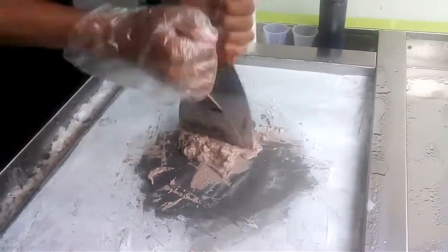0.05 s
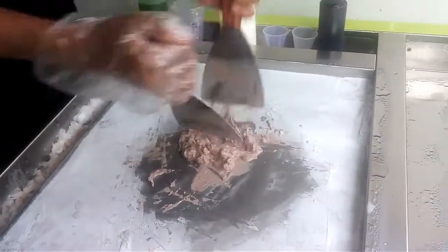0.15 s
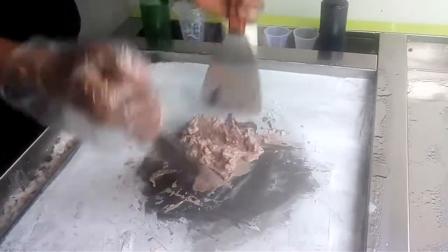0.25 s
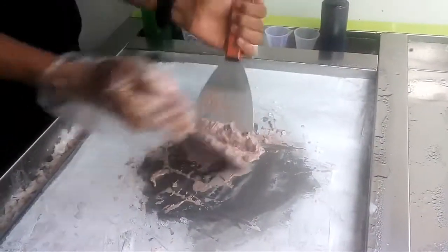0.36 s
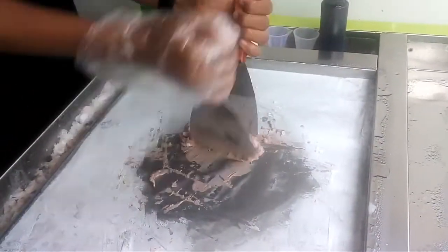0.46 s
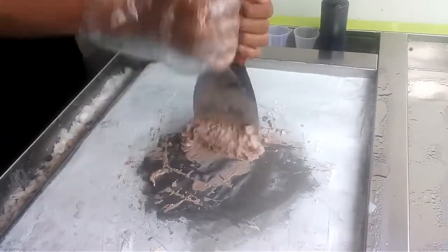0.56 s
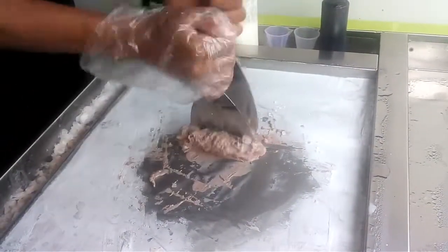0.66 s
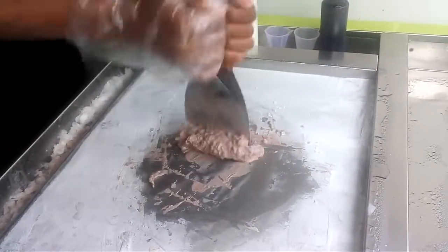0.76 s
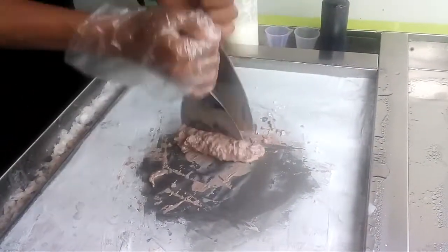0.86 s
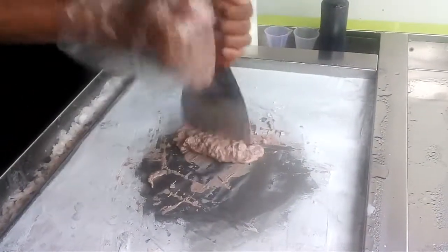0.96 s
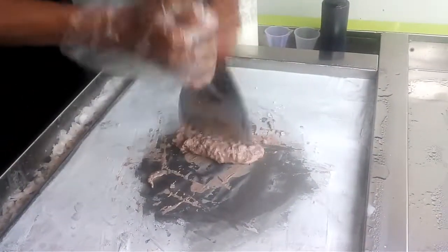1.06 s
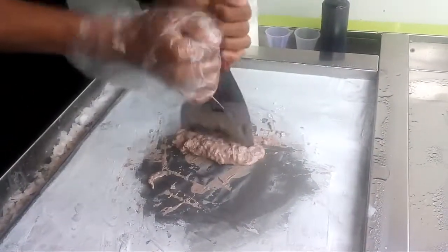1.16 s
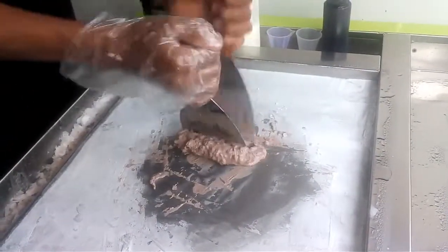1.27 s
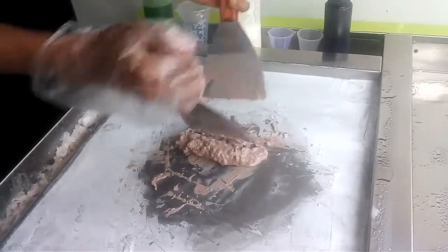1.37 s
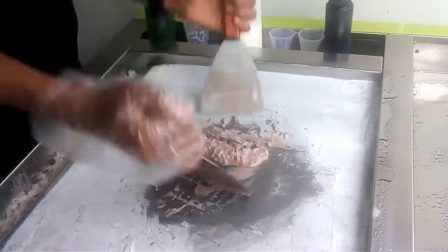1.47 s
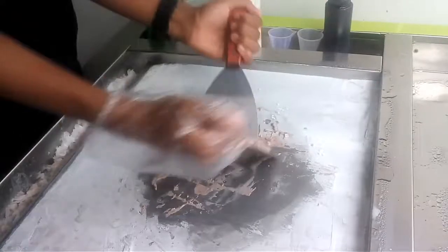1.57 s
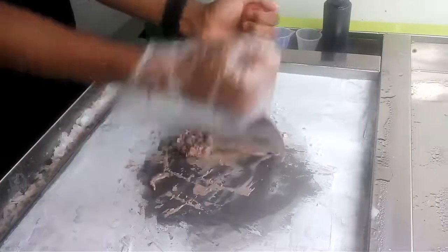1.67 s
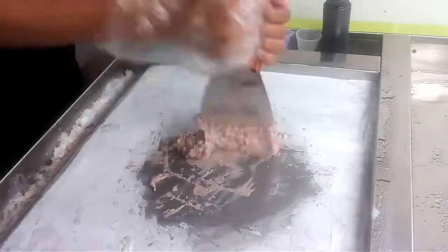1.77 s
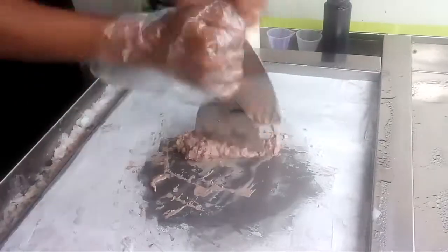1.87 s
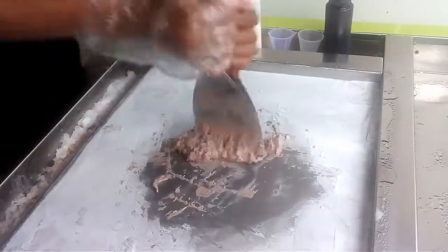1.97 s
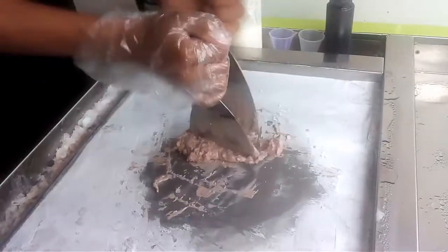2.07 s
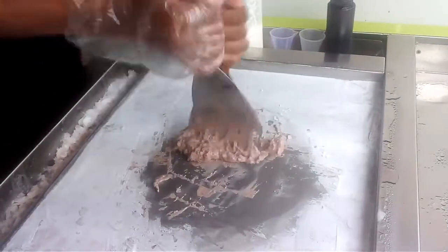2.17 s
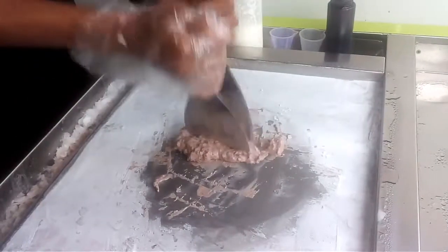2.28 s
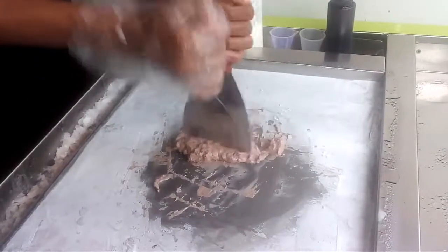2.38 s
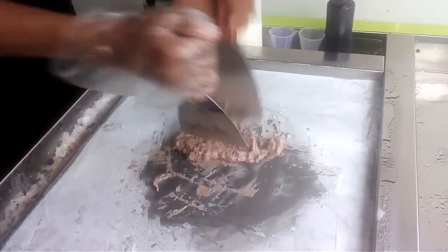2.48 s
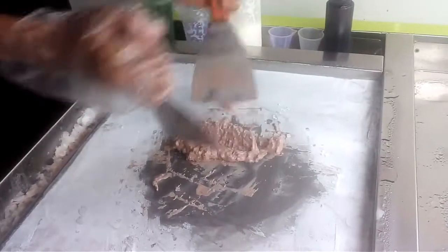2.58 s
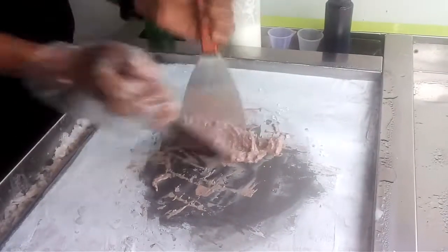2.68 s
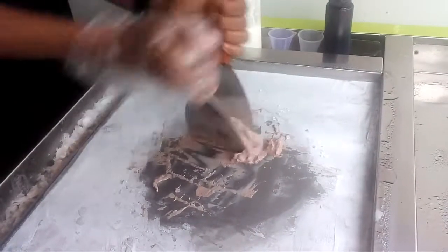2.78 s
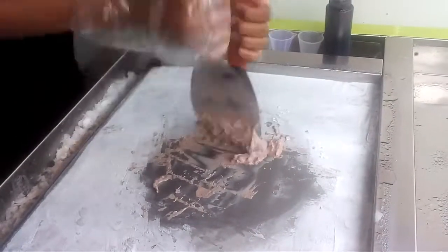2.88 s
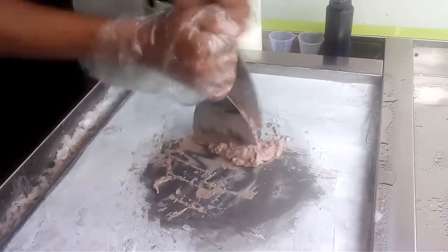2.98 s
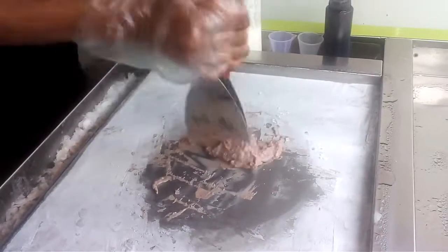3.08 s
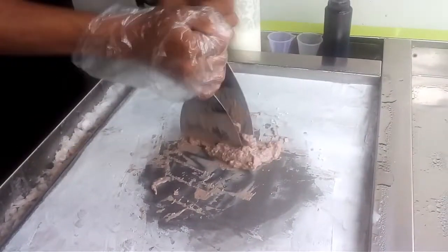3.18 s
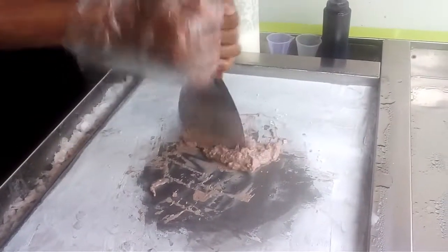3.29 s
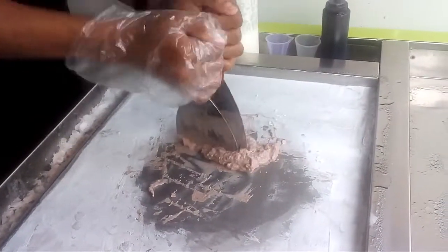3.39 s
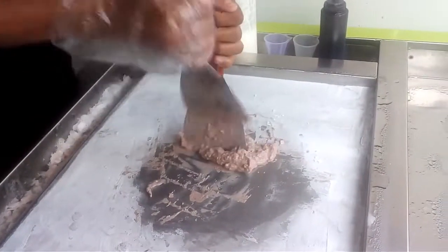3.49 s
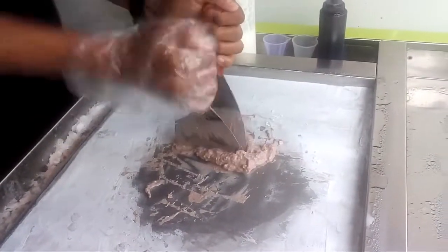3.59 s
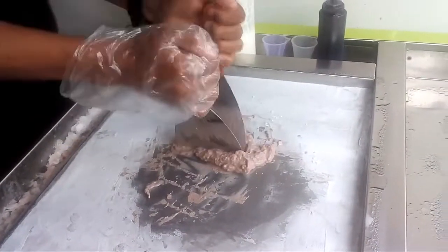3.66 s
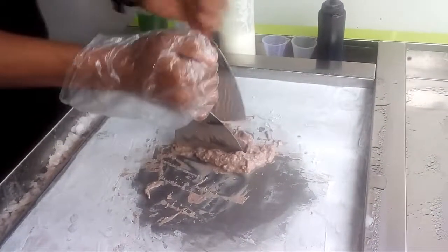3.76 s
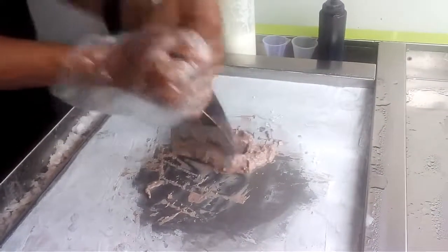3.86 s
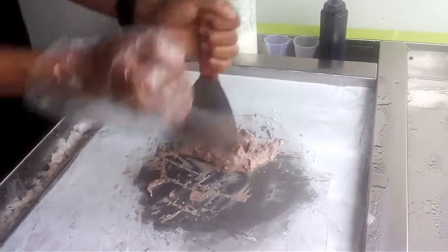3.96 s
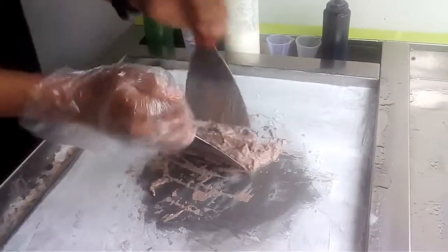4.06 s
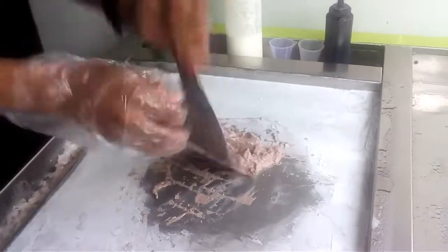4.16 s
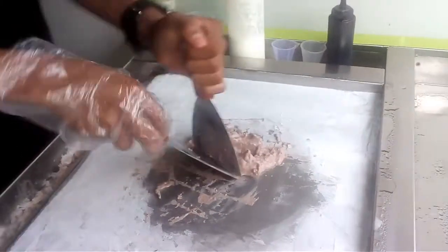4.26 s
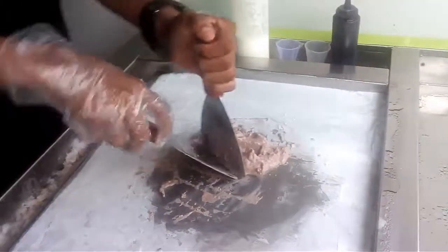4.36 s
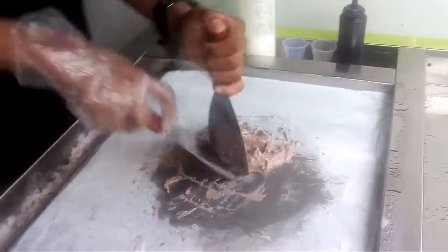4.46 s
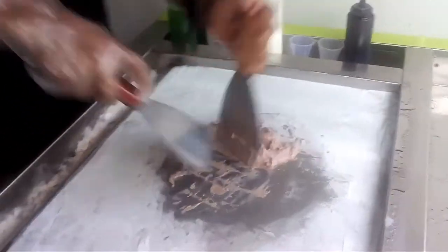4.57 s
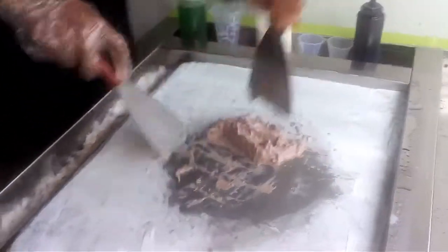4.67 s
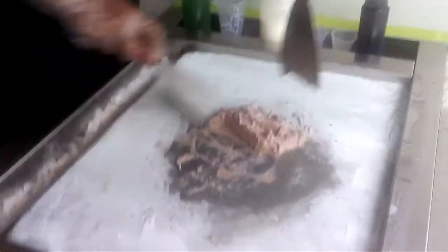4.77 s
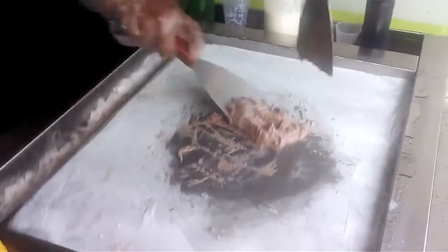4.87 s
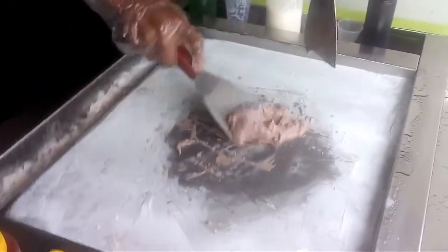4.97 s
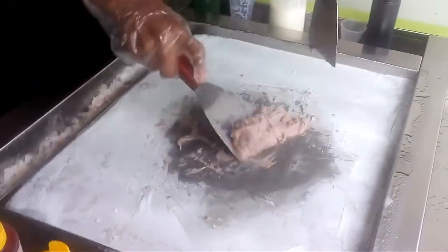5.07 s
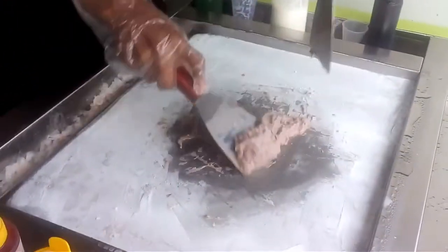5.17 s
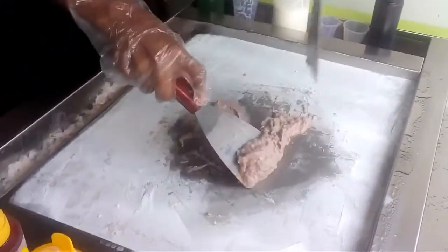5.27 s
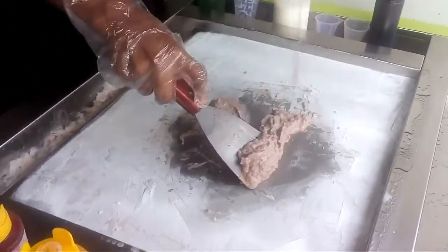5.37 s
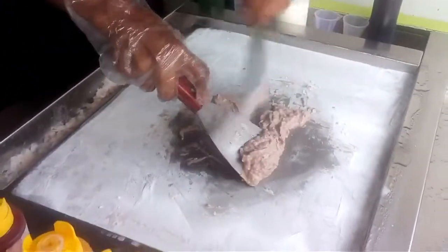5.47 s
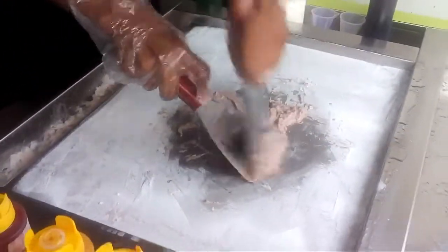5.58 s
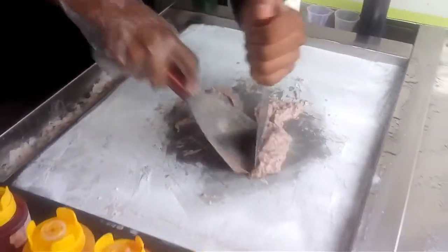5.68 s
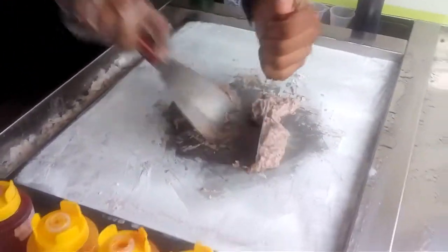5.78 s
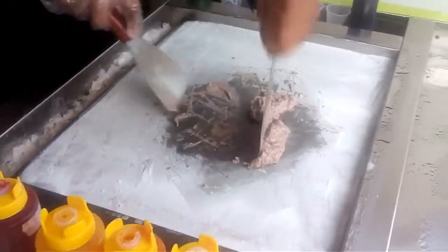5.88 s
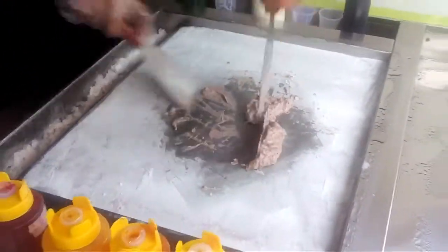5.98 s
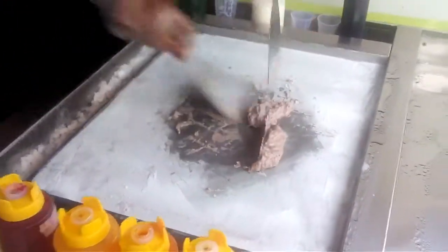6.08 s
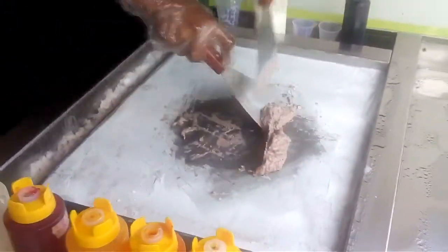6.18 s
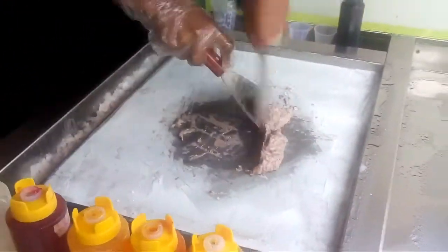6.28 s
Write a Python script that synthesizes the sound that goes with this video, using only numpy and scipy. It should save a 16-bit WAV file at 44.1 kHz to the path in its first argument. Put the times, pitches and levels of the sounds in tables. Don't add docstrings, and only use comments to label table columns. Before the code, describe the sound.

Close, dry metallic chopping on a cold steel pan. Three quick blows land at 0-0.15 s, then a glancing one at 0.4 slides into a short gritty scrape. A burst of chops runs from 0.74 to 1.3, loudest near 1.04, each a hard crack with a mid-bright clang dying in about a quarter second; thin corner ticks often come just before. Two faint distant horn toots follow at 1.33 and 1.52, then a slanted hit and scrape at 1.6. Chops resume 1.97-2.5, a glance at 2.78, another burst 3.1-3.45, then spaced blows at 3.7, 4.0, 4.12 and 4.34. Chiller rumble, wavering whine and soft hiss lie beneath. From 4.4 wind buffets the microphone, with a hard low slap at 4.73. Faint scrapes at 4.85-5.4, a dull knock at 5.7, and brighter scraping at 6.05-6.2 finish.

```python
import sys
import numpy as np
from scipy import signal
from scipy.fft import rfft, irfft
from scipy.io import wavfile
from scipy.ndimage import uniform_filter1d

SR = 44100
rng = np.random.default_rng(int(sys.argv[2]) if len(sys.argv) > 2 else 0)


def dump_mix(stems):
    frames = np.atleast_2d(stems).T
    limited = np.clip(frames, -1, 1)
    pcm = np.round(limited * 32767).astype(np.int16)
    wavfile.write(sys.argv[1], SR, pcm)


def rack_gain(trim_db):
    fader = np.asarray(trim_db, float)
    return 10 ** (fader / 20)


N = 279594

# (time [s], peak [dB], brightness [dB/octave], firmness [dB])
SQUARE_CHOPS = [(0.0004, -13.5, -5.5, 0), (0.0783, -9.5, -2, 2.5), (0.148, -11, -1, -1),
                (0.7383, -18.5, -4, 4.5), (0.855, -10.5, -1.5, 2), (0.9331, -22, -1, 3.5),
                (1.042, -1, -0.7, -3), (1.1237, -16, -1.5, -2), (1.2183, -4, -0.5, 0),
                (1.295, -9.5, -2, -8), (1.974, -12, -6.5, 2), (2.093, -5, -1.9, 0.34),
                (2.174, -7, -4, -6.5), (2.2716, -6.5, 0, 1.3), (2.3593, -13, -4, -1), (2.441, -9, -0.5, 0),
                (2.5138, -8.5, -1.5, -5), (3.0974, -8.5, -3.5, -0.5), (3.194, -4, -1.5, -3),
                (3.2707, -18, -2, 4.5), (3.3791, -4, -3, -3.5), (3.4434, -14.5, -1, 1.5),
                (3.7057, -8, -1.5, -2.65), (3.9919, -4, -0.5, -1.5), (4.124, -7.5, 0.5, 0.5),
                (4.3355, -5, -1.5, -3.5)]
# (time [s], peak [dB], brightness [dB/octave], firmness [dB], thud [dB])
GLANCING_CHOPS = [
    (0.4191, -12.5, 1.1, -0.4, -6),
    (1.6031, -13, -2, 1.5, -8.5),
    (2.7812, -17.5, 1.2, 5.5, -6),
    (4.8494, -44, -33, 12, 4),
    (5.662, -24, 6.5, -2, -5.5),
    (5.7219, -14.5, -7, -5.5, 1.5),
    (6.0516, -30.5, -1.5, 2, -7),
]
# (frequency [Hz], level [dB], t60 [s])
PAN_MODES = [(1213, -14, .25), (1707, -8, .13), (1913, -8, .13), (2125, -3, .14), (2165, -1, .17),
             (2230, -1, .15), (2275, 0, .18), (2320, -1, .17), (2400, -3, .17), (2654, -8, .15),
             (2910, -9, .15), (3320, -10, .13), (3630, -10, .1), (4070, -6, .1), (4226, -5, .14),
             (4518, -11, .13)]
# (frequency [Hz], level [dB], t60 [s])
PAN_LOW_MODES = [(262, -9, .3), (310, -7, .35), (403, -5, .3), (455, -9, .25), (726, -16, .2),
                 (899, -17, .15), (1105, -11, .2), (1391, -10, .2)]
# (frequency [Hz], density [dB/Hz])
CRACK_SPECTRUM = [(120, -47.5), (200, -23), (380, -15), (709, -27), (1080, -9), (1530, -11.5), (1810, -6.5),
                  (2290, -2), (3250, -8.5), (4200, 0.5), (4950, -18), (6640, -12.5), (16000, -47.5)]
# (frequency [Hz], density [dB/Hz])
AFTER_RING_SPECTRUM = [(41, -42.5), (70, -8.5), (351, -13.5), (422, -5.5), (517, -7), (664, -9.5),
                       (1100, -4), (1810, -5), (2270, 1), (3490, -10), (4190, -5), (5500, -17.5),
                       (10900, -24.5), (13300, -38.5), (16000, -50.5)]
# (frequency [Hz], t60 [s])
AFTER_RING_T60 = [(200, 0.39), (530, 0.33), (1390, 0.24), (3680, 0.23), (9700, 0.2)]
# (time [s], level [dB])
WHINE_LEVEL = [(0, -71), (.4, -75.5), (1.5, -70), (2.0, -64.5), (2.8, -65.5), (3.9, -61.5), (4.5, -56.5),
               (4.75, -63.5), (5.0, -58), (5.2, -65), (5.45, -64), (5.65, -68), (5.95, -65.5),
               (6.34, -75.5)]
# (frequency [Hz], width [Hz], level [dB])
WHINE_RESONANCES = [(1575, 42, -7), (1730, 35, -4), (1840, 27, -11.5), (2082, 390, -13.5),
                    (2310, 33, -11.5), (2513, 34, -20), (1410, 36, -13)]
# (frequency [Hz], density [dB/Hz])
RUMBLE_SPECTRUM = [(12, -54), (20, -22), (64, -10), (102, -7.5), (121, -2), (145, -21.5), (193, -16),
                   (236, -30), (300, -20.5), (390, -45.5), (660, -120)]
# (frequency [Hz], density [dB/Hz])
FLOOR_SPECTRUM = [(88, -40), (150, -13), (400, -18.5), (433, -9.5), (628, -19), (1180, -17.5), (1320, -22),
                  (1780, -12.5), (2040, -15), (4470, -28), (6120, -30.5), (11500, -31), (16300, -34.5)]
# (time [s], peak [dB], blade pitch [Hz])
CORNER_TICKS = [(0.0629, -18.5, 4660), (0.408, -57, 2610), (0.841, -22.5, 3590), (1.0303, -19.5, 2230),
                (1.2068, -18.5, 2870), (1.5899, -30, 2280.0), (2.0765, -18, 3700), (2.162, -26.5, 3770),
                (2.2576, -18.5, 3340), (2.351, -25.5, 3970), (2.4292, -23, 2060), (2.7723, -29, 2280),
                (3.1812, -21.5, 3920), (3.3581, -28, 3880), (3.9155, -29.5, 3210), (4.2726, -22.5, 4500),
                (4.85, -58, 2230), (5.649, -46, 3214)]
# (time [s], peak [dB], blade pitch [Hz])
MORE_CORNER_TICKS = [
    (.7292, -45, 2310),
    (.9245, -25, 6500),
    (1.1165, -30, 4300),
    (3.089, -49, 4500),
    (3.3655, -27, 4000),
    (3.695, -49, 4200),
    (3.984, -27, 4200),
]
# (frequency [Hz], density [dB/Hz])
RATTLE_SPECTRUM = [(410, -53), (700, -22), (1460, -13), (2100, -1), (2990, -5), (4150, 0.5), (5120, -16),
                   (6570, -1.5), (7790, -28.5), (9110, -13), (10500, -33.5), (12200, -25.5), (16000, -43.5)]
# (fullest at [s], rise [s], level [dB], fall [dB/s], brightness [dB])
SCRAPE_STROKES = [
    (.45, .01, -43.5, 170, -3),
    (1.62, .015, -45.5, 149, 5),
    (2.8, .01, -51, 189.5, -6),
    (4.851, .005, -56.5, 133, 2),
    (4.98, 0.0298, -59, 200.5, 1),
    (5.12, .12, -67, 399, 6),
    (5.37, .09, -74.5, 149.5, 4.5),
    (5.7, 0.14, -64.5, 70, -6),
    (6.06, 0.0087, -56.5, 81, 1),
    (6.19, .12, -48.5, 293, 8.5),
]
# (frequency [Hz], density [dB/Hz])
SCRAPE_SPECTRUM = [(350, -71), (600, -42), (801, -17), (997, -36), (1290, -15), (1750, -23), (2310, 12.5),
                   (2990, -18.5), (4160, -37), (6120, -10.5), (6830, -18.5), (7830, -37), (9360, -30),
                   (12300, -30.5), (16000, -47)]
# (frequency [Hz], width [Hz], level [dB])
BLADE_RESONANCES = [(2280, 37, -1), (2364, 15, 6.5), (2555, 180, -3.5), (3250, 200, -5.5), (4056, 200, -5),
                    (4260, 150, -6.5), (6156, 180, -12.5), (6200, 410, -13), (8630, 630, -16),
                    (12560, 1200, -17.5)]
# (time [s], level [dB], frequency [Hz], t60 [s])
PAN_SHOVES = [
    (0.458, -47.5, 314, 0.36),
    (1.606, -38, 308, 0.22),
    (4.868, -44, 473, 0.13),
    (5.735, -42, 382, 0.14),
]
# (start [s], length [s], level [dB])
HORN_TOOTS = [
    (1.33, .155, -62.5),
    (1.52, .065, -64),
]
# (multiple of fundamental, level [dB])
HORN_PARTIALS = [(9, -16), (10, 0), (11, -16)]
# (start [s], length [s], level [dB], upper rush [dB])
WIND_GUSTS = [
    (4.37, 0.2, -49.5, -10),
    (4.553, 0.059, -34.5, -25),
    (4.641, .11, -39.5, -13),
    (4.779, 0.41, -38, -18),
    (5.249, 0.35, -61.5, -22),
    (5.573, 0.028, -48, -18),
    (5.654, 0.15, -42.5, -15.5),
    (5.891, .24, -40.5, -14.5),
    (6.183, .13, -57, -19),
]
# (frequency [Hz], density [dB/Hz])
WIND_SPECTRUM = [(12, -54), (20, -4), (44, 2), (97, 8), (117, -5.5), (141, -7.5), (289, -34), (319, -61),
                 (400, -41), (520, -61), (880, -120)]
# (time [s], level [dB], frequency [Hz])
WIND_SLAPS = [
    (4.5, -36, 150),
    (4.575, -38, 150),
    (4.716, -30, 140),
    (4.7255, -13.5, 125),
    (5.085, -36, 130),
    (5.17, -35, 130),
]
# (frequency [Hz], gain [dB])
MICROPHONE_RESPONSE = [(8500, 1.23), (9800, 4.5), (10700, -13.5), (11600, 4), (13000, 3.5), (16000, -2)]


def noise():
    return rng.standard_normal(N)


def rms_one(x):
    return x / np.sqrt(np.mean(x ** 2) + 1e-20)


def butter(x, order, hz, kind="low"):
    return signal.sosfilt(signal.butter(order, hz, kind, fs=SR, output="sos"), x)


def in_time(rows):
    s, *columns = np.transpose(rows)
    return [np.interp(np.arange(N) / SR, s, c) for c in columns]


def at_hz(points, hz):
    table_hz, values = np.transpose(points)
    return np.interp(np.log(hz), np.log(table_hz), values)


def coloured(x, spectrum):
    size = 8192
    hz = np.maximum(np.arange(size // 2 + 1) * SR / size, 1)
    cepstrum = irfft(np.log(rack_gain(at_hz(spectrum, hz))))
    cepstrum[1:size // 2] *= 2
    cepstrum[size // 2 + 1:] = 0
    response = irfft(np.exp(rfft(cepstrum)))
    return signal.fftconvolve(x, response / np.sqrt(np.sum(response ** 2)))[:N]


def drift(rate_hz):
    r = np.exp(-80 * np.pi * rate_hz / SR)
    slow = signal.lfilter([1], [1, -2 * r, r * r], rng.standard_normal(N // 40 + 2002))[2000:]
    return np.interp(np.arange(N) / 40, np.arange(len(slow)), rms_one(slow))


def at_speed(x, speed):
    return np.interp(np.cumsum(speed), np.arange(N), x, period=N)


def grains(spread_db, density):
    strength = rack_gain(spread_db * np.minimum(rng.exponential(1, N), 3))
    return rms_one(noise() * strength * (rng.random(N) < density))


def impulses(times_s, sizes):
    train = np.full(N, 1e-18)
    at = np.round(np.asarray(times_s) * SR).astype(int)
    np.add.at(train, np.clip(at, 0, N - 1), sizes)
    return train


def ring(clicks, hz, t60_s):
    r, w = rack_gain(-60 / (t60_s * SR)), 2 * np.pi * hz / SR
    return signal.lfilter([0, np.sin(w)], [1, -2 * r * np.cos(w), r * r], clicks)


def fade(clicks, t60_s, rise_s):
    r, q = rack_gain(-60 / (t60_s * SR)), np.exp(-1 / (rise_s * SR))
    decay = signal.lfilter([1], [1, -r], clicks)
    return signal.lfilter([1 - q], [1, -q], decay)


def swells(full_s, rise_s, hold_s, level_db, fall_db_per_s, *values):
    s = np.arange(0, N / SR, .001)
    age_s = s[:, None] - full_s
    rise_db = 25.5 * np.maximum(-age_s / rise_s, 0)
    fall_db = fall_db_per_s * np.maximum(age_s - hold_s, 0)
    shapes_db = level_db - rise_db - fall_db
    loudest = shapes_db.argmax(axis=1)
    top = (np.arange(len(s)), loudest)
    return in_time(np.transpose([s, shapes_db[top], age_s[top]] + [v[loudest] for v in values]))


def landings():
    square = [(s, db, -5 - 0.4 * (db + firm), bright, firm, -1.16) for s, db, bright, firm in SQUARE_CHOPS]
    slanted = [(s, db, thud, bright, firm, -9.5) for s, db, bright, firm, thud in GLANCING_CHOPS]
    s, peak_db, thud_db, bright_db, firm_db, snap_db = np.transpose(sorted(square + slanted))
    return s, peak_db, thud_db, bright_db, firm_db, snap_db + 1.16 * np.minimum(firm_db, 5)


def tilt_db(hz, thud_db, bright_db):
    return thud_db * np.clip(np.log2(1400 / hz), 0, 1) + bright_db * np.clip(np.log2(hz / 2500), 0, 2)


def chops():
    crack_t60_s, crack_db, strike_db, ring_db, mode_db = 0.04, -5, 17, -10, -27.0
    band_scatter_db, mode_scatter_db, wobble_db, low_modes_db = 0.7, 2.2, 2.5, 2
    s, peak_db, thud_db, bright_db, after_db, snap_db = landings()
    chatter = grains(2.7, .3)
    wash = rms_one(coloured(noise(), AFTER_RING_SPECTRUM))
    luck = rng.standard_normal((len(s), 60))
    rebound_s = s + 0.0016 + .0003 * luck[:, -1]
    edges_hz = 150 * 2 ** (np.arange(-3, 21) / 3)
    crack, after_ring = np.zeros(N), np.zeros(N)
    for k, (low_hz, high_hz) in enumerate(zip(edges_hz, edges_hz[1:])):
        hz = np.sqrt(low_hz * high_hz)
        band_hz = [low_hz, high_hz]
        size_db = peak_db + tilt_db(hz, thud_db, bright_db) + band_scatter_db * luck[:, k]
        strike = rack_gain(size_db + snap_db + strike_db)
        seat_t60_s = crack_t60_s * (2500 / hz) ** 0.6
        seating = chatter * fade(impulses(s, rack_gain(size_db + crack_db)), seat_t60_s, 0.000076)
        seating += chatter * fade(impulses(s, rack_gain(-13) * strike), 0.0054, 0.00038)
        blows = impulses(rebound_s, 0.66 * strike) - impulses(s, strike)
        crack += butter(seating + blows, 2, band_hz, "band")
        late = fade(impulses(s, rack_gain(size_db + after_db + ring_db)), at_hz(AFTER_RING_T60, hz), 3.4 / hz)
        after_ring += butter(wash, 2, band_hz, "band") * late
    modes = coloured(crack, CRACK_SPECTRUM)
    for k, (hz, level_db, t60_s) in enumerate(list(PAN_MODES) + list(PAN_LOW_MODES)):
        size_db = peak_db + after_db + level_db + mode_db + low_modes_db * (hz < 500)
        size_db = size_db + tilt_db(hz, thud_db, bright_db) + mode_scatter_db * luck[:, 30 + k]
        wobble = rack_gain(wobble_db * drift(hz / 60))
        modes += ring(impulses(s, rack_gain(size_db)), hz, t60_s) * wobble
    return after_ring + butter(modes, 3, 210, "high")


def chiller():
    whine, (level_db,) = np.zeros(N), in_time(WHINE_LEVEL)
    for hz, width_hz, db in WHINE_RESONANCES:
        t60_s = 1.2 / width_hz
        narrow = rms_one(ring(ring(noise(), hz, t60_s), hz, t60_s))
        upper_db = 1.5 * (hz > 1850)
        whine += rack_gain(db + upper_db + 1.5 * drift(14)) * narrow
    whine = at_speed(whine, 1 + .012 * drift(2.6))
    rumble = rack_gain(-59.5 + 1.5 * drift(2)) * rms_one(coloured(noise(), RUMBLE_SPECTRUM))
    return rack_gain(level_db) * rms_one(whine) + rumble


def steady_hiss():
    return rack_gain(-66.5 + 1.3 * drift(3)) * rms_one(coloured(noise(), FLOOR_SPECTRUM))


def ticks():
    s, peak_db, pitch_hz = np.transpose(list(CORNER_TICKS) + list(MORE_CORNER_TICKS))
    rattle = coloured(noise(), RATTLE_SPECTRUM)
    out = rattle * fade(impulses(s, rack_gain(peak_db - 7.0)), 0.021, .0002)
    out += rattle * fade(impulses(s, rack_gain(peak_db - 22.5)), 0.39, 0.0011)
    click = impulses([0], [1])[:3000]
    for at_s, db, hz in zip(s, peak_db, pitch_hz):
        out[round(at_s * SR):][:3000] += rack_gain(db - 12) * ring(click, hz, 0.073)
    return out


def scrape():
    full_s, rise_s, db, fall_db_per_s, bright_db = np.transpose(SCRAPE_STROKES)
    level_db, age_s, bright_db = swells(full_s, rise_s, .04, db, fall_db_per_s, bright_db)
    bright_db = bright_db + 39.5 * np.clip(age_s, -.2, .08)
    frost = grains(6.0, 0.97)
    out = rack_gain(bright_db - 6.5) * rms_one(coloured(frost, SCRAPE_SPECTRUM))
    bend = 1 + np.clip(.8 * age_s, -.06, .06)
    for hz, width_hz, db in BLADE_RESONANCES:
        gain_db = db - 9.0 + 3.0 * drift(8) + bright_db * np.clip(np.log2(hz / 2400), 0, 1)
        resonance = rms_one(ring(frost, hz, np.log(1000) / np.pi / width_hz))
        out += rack_gain(gain_db) * at_speed(resonance, bend + .025 * drift(6))
    return rack_gain(level_db + 2.0 * drift(47)) * butter(out, 3, 1500, "high")


def shoves():
    pushes = sum(ring(impulses([s], [rack_gain(db)]), hz, t60_s) for s, db, hz, t60_s in PAN_SHOVES)
    return butter(pushes, 2, 500)


def horn():
    start_s, length_s, db = np.transpose(HORN_TOOTS)
    phase = 2 * np.pi * 352.6 * np.arange(N) / SR
    level_db = swells(start_s, .03, length_s, db, 900)[0]
    partials = sum(rack_gain(db) * np.sin(k * phase) for k, db in HORN_PARTIALS)
    return np.sqrt(2) * rack_gain(level_db) * partials


def wind():
    start_s, length_s, db, rush_db = np.transpose(WIND_GUSTS)
    level_db, _, rush_db = swells(start_s, 0.029, length_s, db, 439, rush_db)
    low = rms_one(coloured(noise(), WIND_SPECTRUM))
    low /= (uniform_filter1d(low ** 2, size=1500) + 0.051) ** (0.67 / 2)
    rush = rms_one(butter(noise(), 3, [120, 270], "band") * rack_gain(6.0 * drift(27)))
    slaps = -sum(ring(impulses([s], [rack_gain(db)]), hz, .045) for s, db, hz in WIND_SLAPS)
    return rack_gain(level_db) * (rms_one(low) + rack_gain(rush_db + 2.5) * rush) + butter(slaps, 3, 750)


def scene():
    blades = chops() + ticks() + scrape() + shoves()
    background = chiller() + steady_hiss() + horn()
    return (coloured(blades, MICROPHONE_RESPONSE) + background + wind())[None]


def top_cut(x):
    return signal.sosfilt(signal.butter(12, 16480, fs=SR, output="sos"), x)


def record(dry):
    mix = signal.sosfilt(signal.cheby1(8, 1, 16150, fs=SR, output="sos"), dry)
    return top_cut(mix)


dry = scene()
out = record(dry)
dump_mix(out)
```